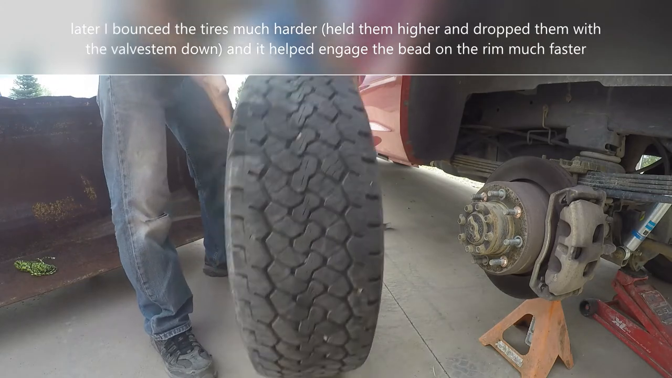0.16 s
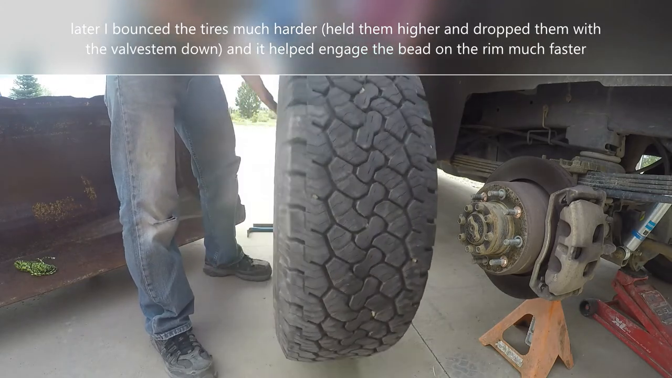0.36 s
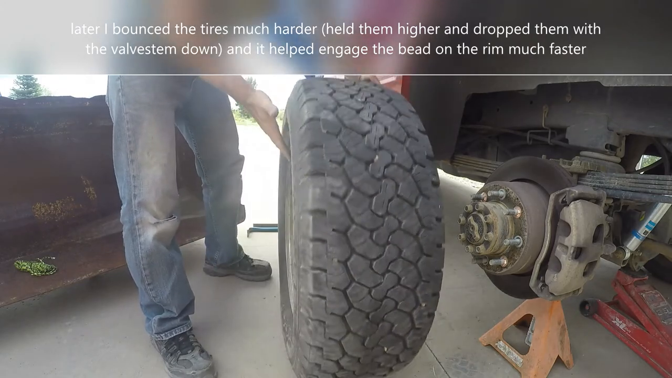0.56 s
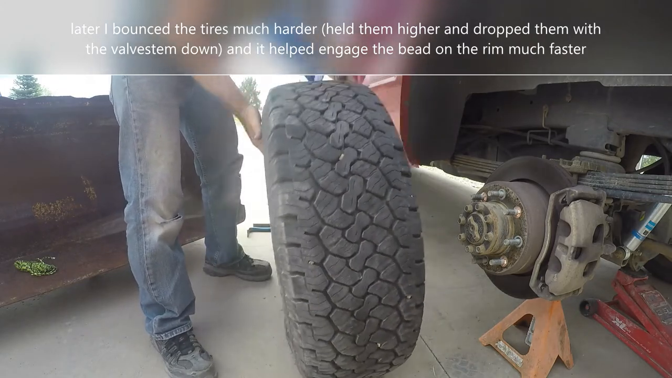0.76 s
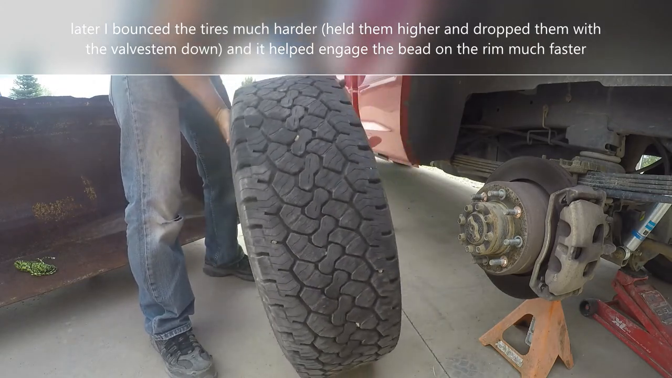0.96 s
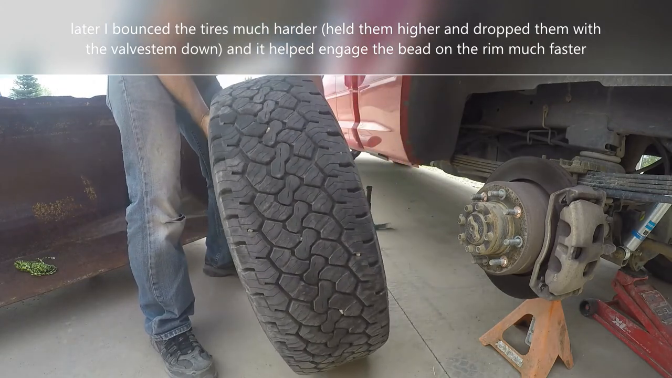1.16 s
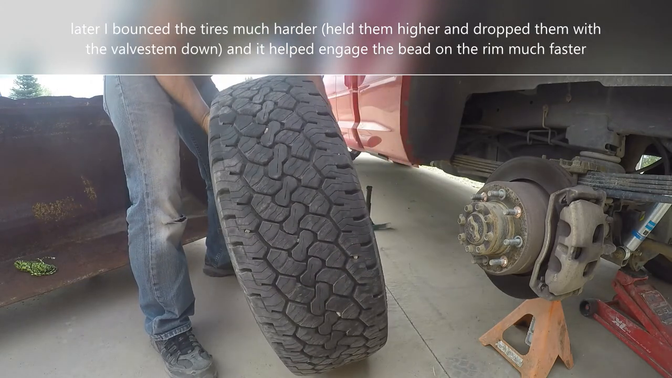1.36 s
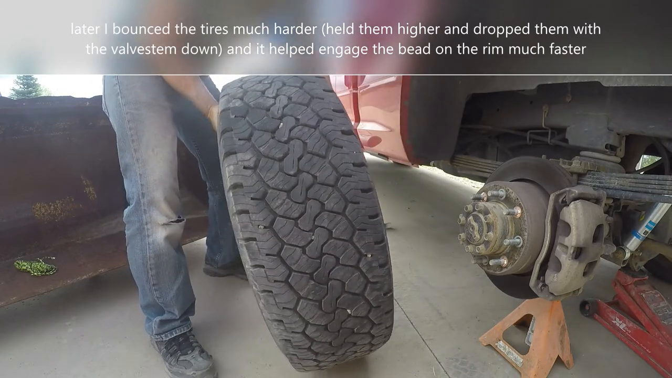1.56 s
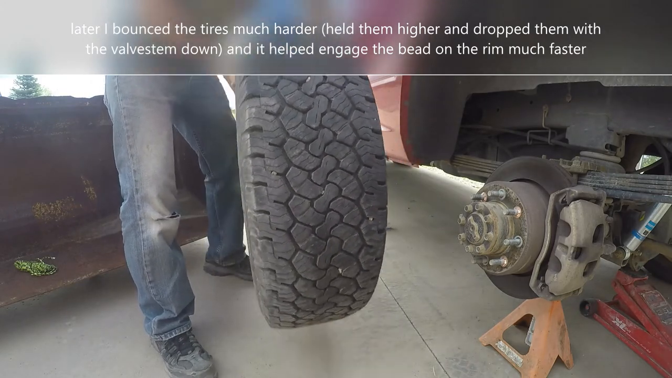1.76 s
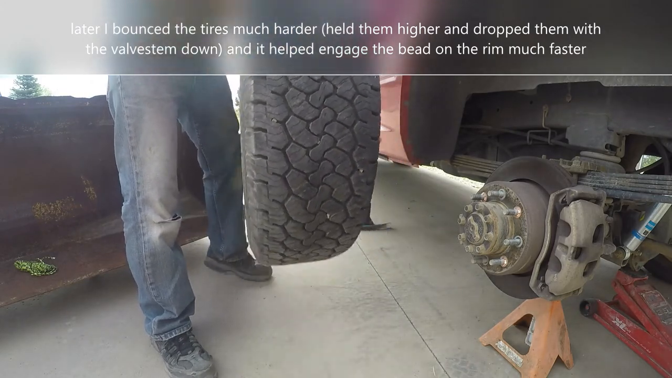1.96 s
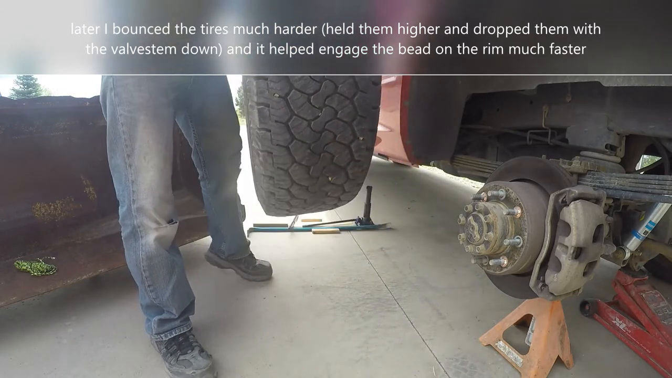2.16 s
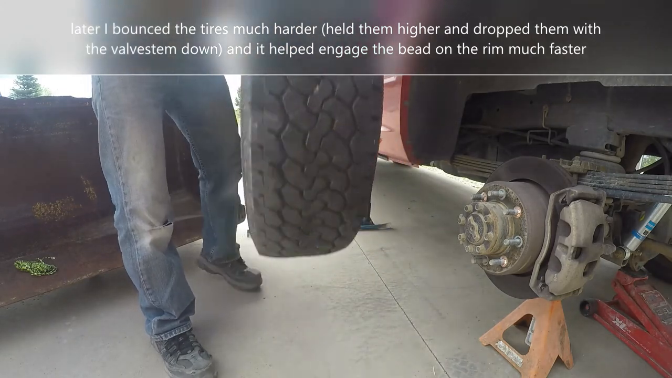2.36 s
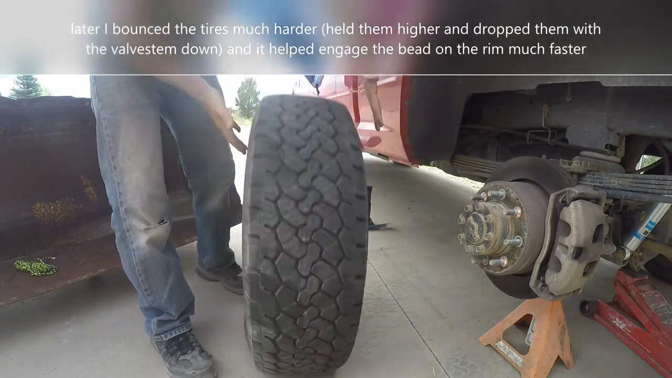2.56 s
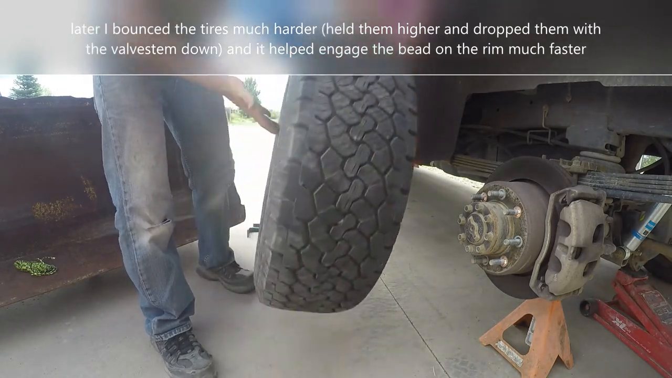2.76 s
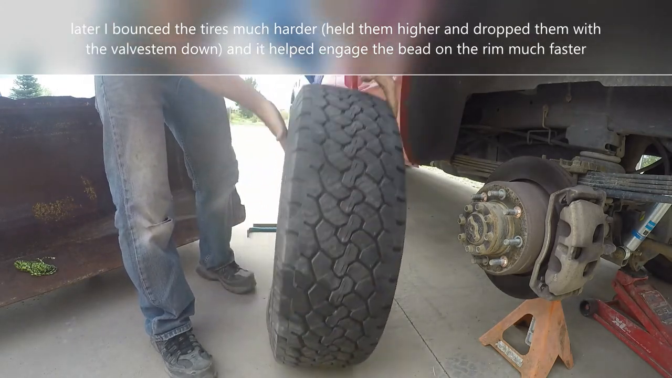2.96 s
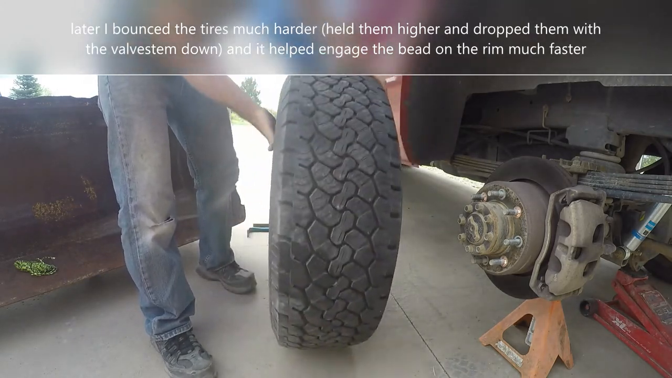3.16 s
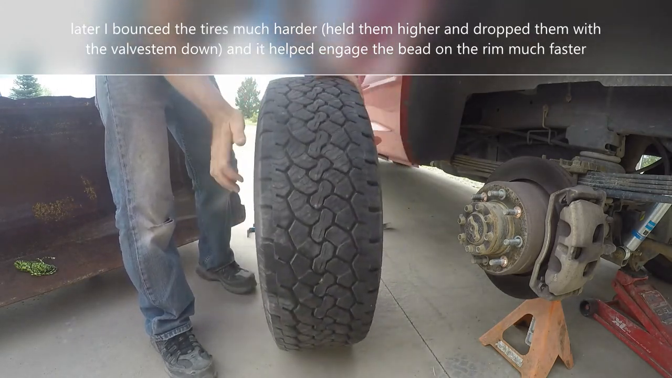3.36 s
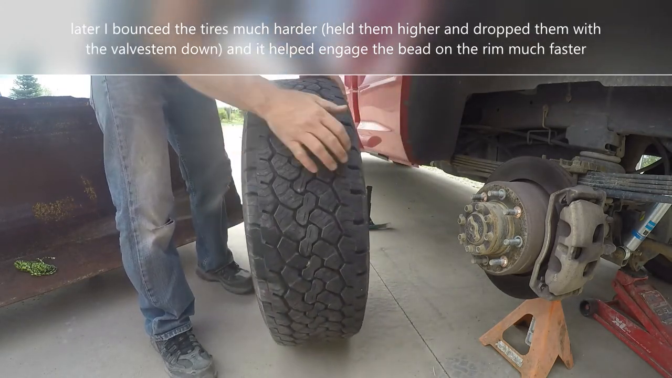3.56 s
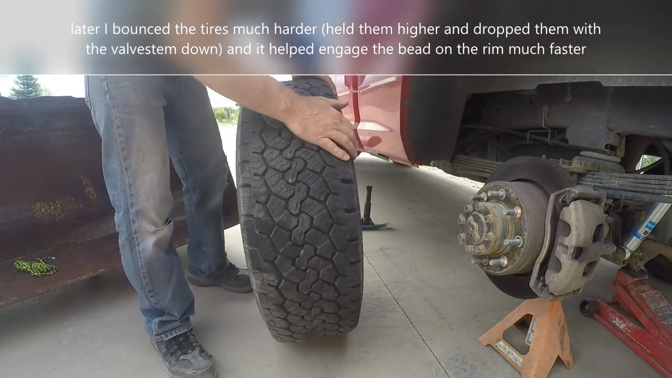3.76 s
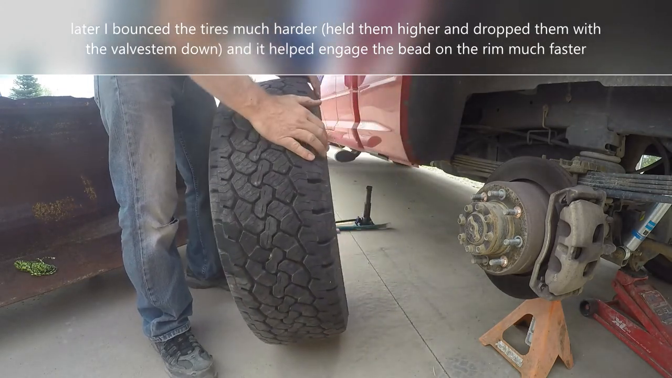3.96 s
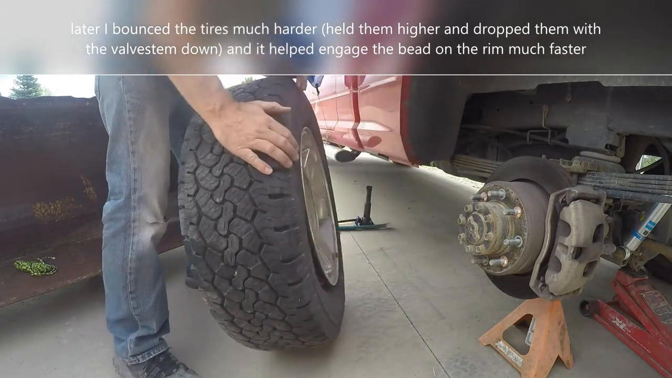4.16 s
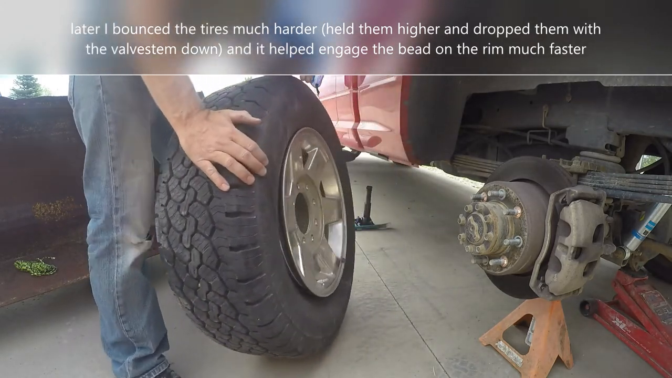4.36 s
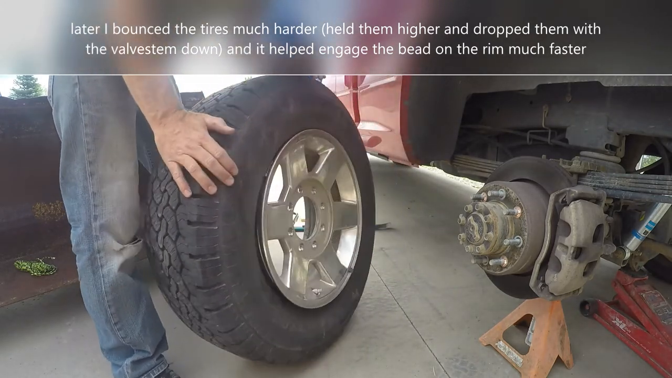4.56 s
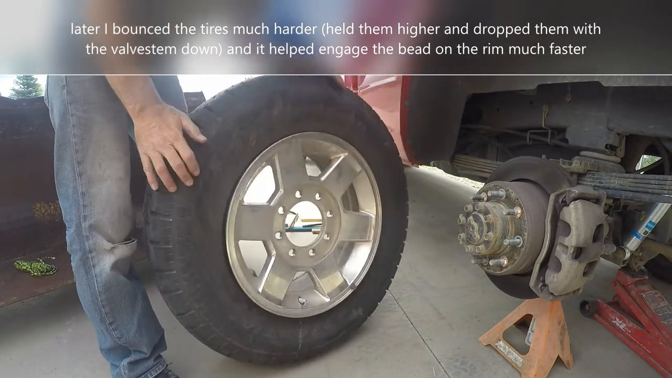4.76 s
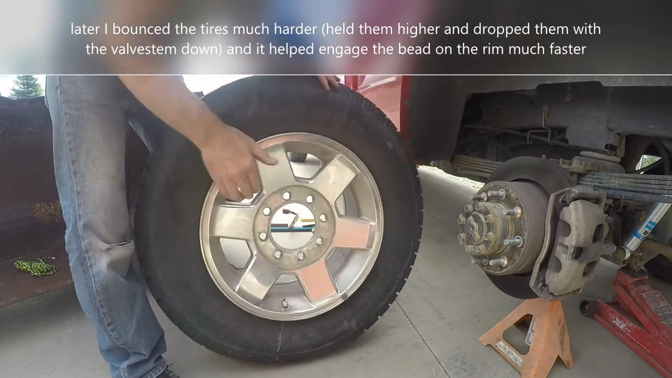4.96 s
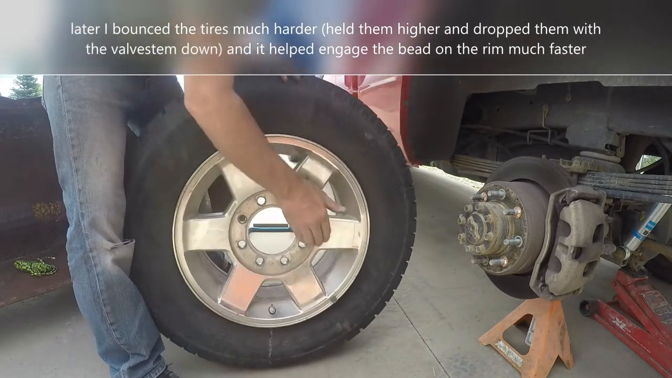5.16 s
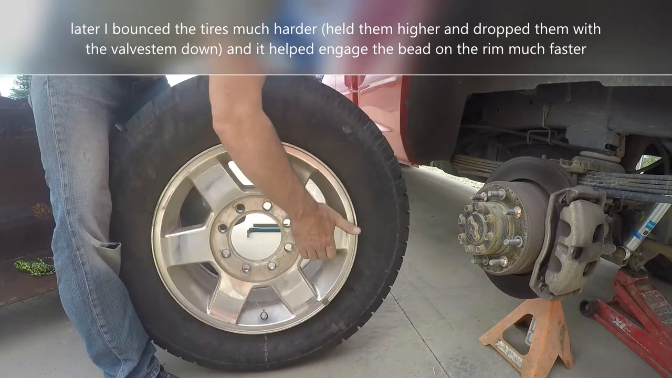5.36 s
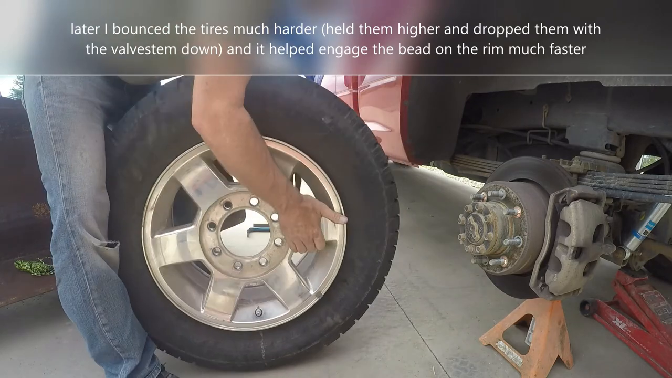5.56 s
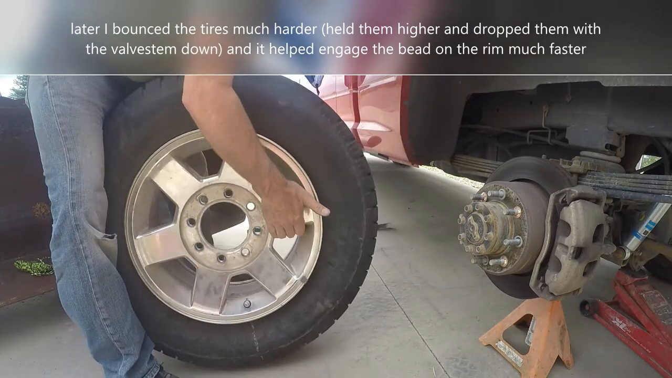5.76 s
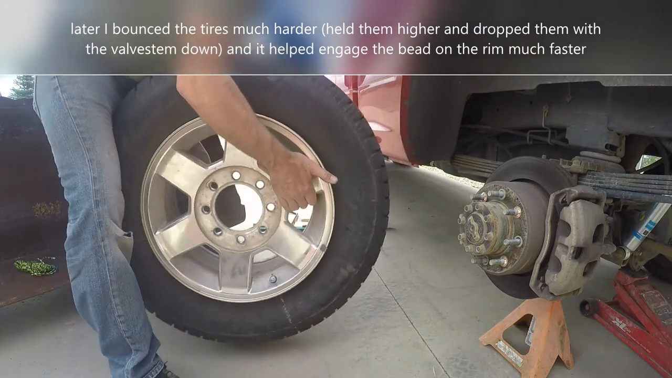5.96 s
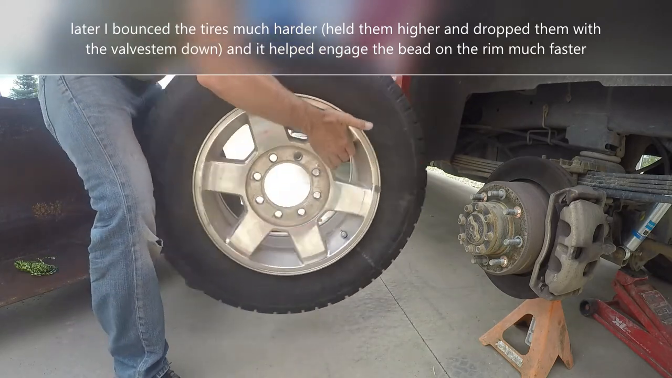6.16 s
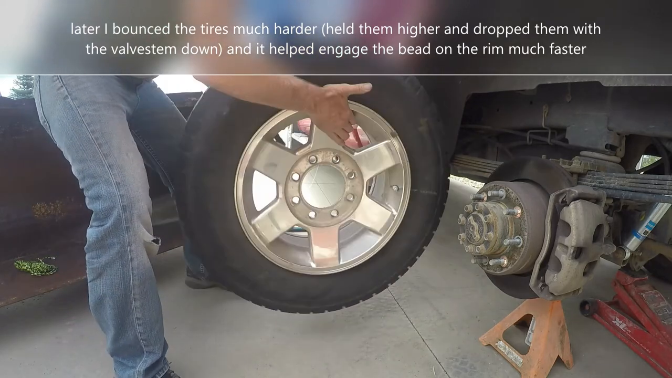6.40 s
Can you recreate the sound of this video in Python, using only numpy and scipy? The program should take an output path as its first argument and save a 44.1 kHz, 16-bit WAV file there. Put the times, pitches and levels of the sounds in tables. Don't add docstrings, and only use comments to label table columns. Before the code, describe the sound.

Two loud, boomy tyre drops with quick shrinking bounces on concrete, followed by hollow hand knocks, a short tread roll and rubbing over faint rumble.

```python
import sys
import numpy as np
from scipy import signal
from scipy.fft import rfft, irfft
from scipy.io import wavfile
from scipy.ndimage import uniform_filter1d

SR = 44100
rng = np.random.default_rng(int(sys.argv[2]) if len(sys.argv) > 2 else 0)


def generate_wav(signal):
    frames = np.transpose(np.atleast_2d(signal))
    scaled = np.clip(frames, -1, 1) * 32767
    pcm = np.round(scaled).astype(np.int16)
    wavfile.write(sys.argv[1], SR, pcm)


def natural_amplitude(level_db):
    exponent = np.asarray(level_db, float) / 20
    return 10 ** exponent


N = 283544
T = np.arange(N) / SR

# start, attack, hold and release, all in seconds.
ROLL = (4.342, 0.13, 0.44, 0.18)


def fade(t, t60):
    return (t >= 0) * np.exp(-np.log(1000) * np.maximum(t, 0) / t60)


def ring(t, hz, t60):
    return fade(t, t60) * np.sin(2 * np.pi * hz * t)


def strike(t, modes, touch):
    out = 0
    for (hz, db, t60), z in zip(modes, touch):
        out = out - natural_amplitude(db - 6.0 + 2.0 * z) * ring(t, hz * (1 + 0.012 * z), t60)
    return out


def band(x, lo_hz, hi_hz, order=2):
    sos = signal.butter(order, [lo_hz, min(hi_hz, .45 * SR)], "bandpass", fs=SR, output="sos")
    return signal.sosfilt(sos, x)


def soften(x, hz):
    return signal.sosfilt(signal.butter(2, hz, fs=SR, output="sos"), x)


def hiss(lo_hz, hi_hz, count=N):
    x = band(rng.standard_normal(count), lo_hz, hi_hz, order=3)
    return x / x.std()


def walk(rate):
    k = int(SR / rate)
    steps = np.repeat(rng.standard_normal(N // k + 1), k)
    return 1.3 * uniform_filter1d(uniform_filter1d(steps, k), k)[:N]


def swell(s, attack, hold, release):
    rising = (T - s) / attack
    falling = (s + attack + hold + release - T) / release
    return np.clip(np.minimum(rising, falling), 0, 1)


def add(out, s, x):
    i = int(s * SR)
    out[i:i + len(x)] += x[:len(out) - i]


def town():
    # frequency in Hz, level in dB per Hz.
    spectrum = [(20, -4.5), (60, -5), (150, -16), (280, -26), (1300, -34.5), (2500, -39), (6000, -43.5),
                (15000, -49.5)]
    # frequency in Hz, width in octaves, lift in dB.
    peaks = [(50.7, .22, 10.5), (674, 0.23, 13), (3800, 0.71, 3.5)]
    rows = np.array(spectrum)
    hz = np.arange(N // 2 + 1) * SR / N + 1
    db = np.interp(np.log(hz), np.log(rows[:, 0]), rows[:, 1])
    for peak_hz, width, peak_db in peaks:
        db = db + peak_db * np.exp(-(np.log2(hz / peak_hz) / width) ** 2)
    lines = rfft(rng.standard_normal(N)) * natural_amplitude(db) * (hz < 15300)
    rumble = 0
    edges = [0, 40, 70, 130, 300, 1000, SR]
    for lo, hi in zip(edges, edges[1:]):
        swelling = natural_amplitude(1.1 * walk(5.8) * min(1, 300 / hi))
        rumble = rumble + swelling * irfft(lines * (hz >= lo) * (hz < hi), N)
    drone_hz = 51 + 2.8 * walk(4.5)
    drone = natural_amplitude(-55.5 + 2.5 * walk(5.5)) * np.sin(2 * np.pi * np.cumsum(drone_hz) / SR)
    return rumble * natural_amplitude(-48) / rumble.std() + drone


def wildlife():
    # start in seconds, length in seconds, level in dB.
    phrases = [(4.16, .3, -70.5), (4.465, 0.093, -66.5), (4.6, 0.32, -74), (5.48, .28, -75),
               (5.874, 0.088, -70.5), (5.98, .1, -79), (6.167, 0.087, -67.5), (6.39, .1, -68)]
    # start, attack, hold and release, all in seconds.
    chirp_shape = (6.335, .05, .1, .05)
    hz = 3735 + 10 * walk(3) + 45 * walk(150)
    note = natural_amplitude(3.0 * walk(40)) * np.sin(2 * np.pi * np.cumsum(hz) / SR)
    haze = natural_amplitude(-7) * hiss(3430, 3900)
    attack_s, release_s = 0.026, 0.099
    song = sum(natural_amplitude(db) * swell(s, attack_s, length - attack_s, release_s) for s, length, db in phrases)
    late = np.clip((T - 6.375) / .02, 0, 1)
    chirp = hiss(7050, 7110) + natural_amplitude(9) * late * hiss(3600, 5200)
    return natural_amplitude(2.5) * song * (note + haze) + natural_amplitude(-72) * swell(*chirp_shape) * chirp


def rubbing():
    roll_db = (-61, -66, -51, -61)
    # peak time in seconds, length in seconds, level in dB,
    # hiss share in dB, bass share in dB.
    scuffs = [(0.066, 0.055, -56, -13, 3), (1.147, 0.37, -58.5, -25.5, 6), (1.727, 0.094, -56.5, -18, -12),
              (1.783, 0.049, -66, -2, -5.5), (1.85, 0.087, -57.5, -12.5, 0), (2.13, 0.056, -60, -26.5, 5),
              (2.262, 0.09, -58.5, -17.5, -19.5), (2.427, 0.0635, -41.5, -13.5, -2),
              (2.458, 0.044, -37.5, -34, -13), (3.432, 0.085, -50, -10, 12),
              (3.709, 0.074, -51.5, -17, 9.5), (3.776, 0.14, -42, -15.5, -8.5),
              (4.058, 0.0824, -45, -11.5, -26), (4.323, .1, -42.5, -20, -2.5), (4.525, 0.05, -67, 8, 1),
              (5.191, 0.2, -52.5, -11, -12), (5.356, 0.098, -45, -16.5, -9.5),
              (5.533, 0.13, -50.5, -11.5, -13.5), (5.664, 0.21, -44, -18, 0), (6.0, 0.3, -55.5, -9.5, 4),
              (6.078, 0.083, -43, -22, 0), (6.163, 0.208, -54, -19, -8), (6.42, 0.153, -66, -4.5, -6.5)]
    fidget_db = (-66, -79, -68, -82.5)
    fidget, roll = 2.5 * walk(8.8), swell(*ROLL)
    gains = np.array([natural_amplitude(still + fidget) + natural_amplitude(turning) * roll for still, turning in zip(fidget_db, roll_db)])
    rise_share, fade_db = 0.5, 31.5
    for s, length, db, hiss_db, bass_db in scuffs:
        away = np.maximum((s - T) / rise_share, (T - s) / (1 - rise_share)) / length
        scrape_db = -5.5 + 0.4 * hiss_db
        shares = natural_amplitude(np.array([[0], [hiss_db], [bass_db], [scrape_db]]))
        gains = gains + shares * natural_amplitude(db - fade_db * away / 2)
    return gains


def handling():
    # start in seconds, peak in dB, treble in dB, bass in dB.
    knocks = [(2.127, -40.5, -45, -11.5), (2.149, -46, -20.5, -10), (2.412, -31.5, -15.5, -12),
              (2.45, -29.5, -29, -23.5), (3.425, -39.5, -17, -3), (3.684, -50.5, -3.5, -6),
              (4.273, -23, -37.5, -16.5), (4.312, -29.5, -26, -1.5), (4.339, -48.5, -12.5, -3),
              (4.505, -50, -6, -20), (4.537, -52, 2, -21.5), (4.757, -50, 0, -23), (5.35, -27.5, -28, -26),
              (5.507, -38.5, -24, -16), (5.538, -35, -24, -9), (5.627, -33.5, -30, -24),
              (5.781, -46, -16.5, -3), (5.887, -56, -11, -18), (6.073, -32, -21, -36),
              (6.178, -44, -25, -15)]
    # centre in Hz, half-width in Hz, level in dB.
    squeaks = [(2250, 260, -71), (2570, 250, -69), (1350, 119, -68.5)]
    out, t = np.zeros(N), T[:SR // 4]
    for s, db, treble_db, bass_db in knocks:
        thud = soften(ring(t, 640, 0.037), 1400) + natural_amplitude(-19.5) * hiss(230, 840, count=len(t)) * fade(t, 0.16)
        tick = hiss(1100, 4000, count=len(t)) * fade(t, 0.05)
        boom = hiss(100, 300, count=len(t)) * fade(t, 0.15)
        add(out, s, natural_amplitude(db - 2.5) * (thud + natural_amplitude(treble_db - 3) * tick + natural_amplitude(bass_db - 1.5) * boom))
    squeak = sum(natural_amplitude(db + 2.5 * walk(60)) * hiss(hz - width, hz + width) for hz, width, db in squeaks)
    out += swell(*ROLL) * squeak
    body = natural_amplitude(-7.5) * (hiss(540, 638) + natural_amplitude(1) * hiss(344, 730))
    layers = body, hiss(1400, 4920), natural_amplitude(-8.5) * hiss(73, 390), natural_amplitude(-2) * hiss(670, 1200)
    for layer, gain in zip(layers, rubbing()):
        out += natural_amplitude(2.5 * walk(120)) * layer * gain
    return out


def gusts():
    # start in seconds, peak in dB, frequency in Hz, t60 in seconds, sign of the first push.
    blasts = [
        (.905, -24, 90, .15, 1),
        (2.563, -2, 51, .18, 1),
        (3.007, -2, 46, .16, -1),
        (3.052, -19, 62, .25, 1),
        (3.408, -27, 95, .15, 1),
    ]
    out, t = np.zeros(N), T[:int(.6 * SR)]
    for s, db, hz, t60, sign in blasts:
        add(out, s, sign * natural_amplitude(db) * ring(t, hz, t60) * (1 - np.exp(-t / .006)))
    return out


def grit():
    # start in seconds, rise in seconds, hold in seconds, level in dB, share of top treble in dB.
    sprays = [(0.11, 0.017, 0.037, -42, -14), (0.492, .005, 0.053, -55.5, -10), (.73, .004, .02, -63, -18),
              (2.555, 0.0052, 0.076, -51.5, -21), (2.562, 0.0078, 0.012, -46, -14.5),
              (2.705, .01, .02, -65, -25), (2.975, 0.0021, 0.034, -48, -22), (2.984, .02, 0.014, -58, -1),
              (3.048, .003, 0.0166, -52, -18.5), (3.24, 0.0057, 0.032, -58, -18)]
    out, t = np.zeros(N), T[:int(.6 * SR)]
    for s, rise, hold, db, top_db in sprays:
        top = soften(hiss(5500, 15000, count=len(t)), 7500)
        spray = hiss(2300, 5200, count=len(t)) + natural_amplitude(top_db + 5) * top
        grain_db = 2.5 * walk(260)[:len(t)]
        shape = np.clip(t / rise, 0, 1) * np.maximum(fade(t - rise - hold, 0.26), t < rise + hold)
        add(out, s, natural_amplitude(db + grain_db - 2.5) * spray * shape)
    return out


def shop(t, tail_db):
    # frequency in Hz, early level in dB, early t60 in seconds, late level in dB, late t60 in seconds.
    reverberation = [(148.54, -24, 0.33, -31.5, 0.7), (318, -10.5, 0.066, -31, 0.45),
                     (600, -10, 0.081, -28.5, 0.49), (817, -33, 0.26, -37.5, 0.59),
                     (1123, -18.5, 0.027, -30.5, 0.33), (2220, -34.5, .07, -47, 0.42),
                     (4000, -56, 0.054, -50, 0.46), (8030, -60.5, 0.029, -73.5, .35)]
    out = 0
    for hz, early_db, early_t60, late_db, late_t60 in reverberation:
        fall = natural_amplitude(early_db) * fade(t, early_t60) + natural_amplitude(late_db) * fade(t, late_t60)
        lift = natural_amplitude(tail_db * (hz > 1500))
        out = out + lift * fall * hiss(hz / 1.3, hz * 1.3, count=len(t))
    return out * (1 - np.exp(-t / 0.00067))


def slab(t):
    # frequency in Hz, level in dB, t60 in seconds.
    floor_modes = [(24.4, 3.5, 0.25), (39.9, -7.5, 0.518), (74.4, -5, 0.39), (129.6, -14, .15)]
    dip = -natural_amplitude(1.5) * np.sin(np.pi * np.clip(t / 0.011, 0, 1)) ** 2
    return dip + sum(natural_amplitude(db) * ring(t - .005, hz, t60) for hz, db, t60 in floor_modes)


def tread_wavelet(t):
    pulse = -np.exp(1) * (t > 0) * t / 0.0011 * np.exp(-np.abs(t) / 0.00068)
    return pulse * np.sin(2 * np.pi * 760 * t)


def slap(t, thud_db, tread_db, rim_db):
    # frequency in Hz, level in dB, t60 in seconds.
    sidewall_modes = [(202, -2.5, 0.11), (281, -4.5, .08), (338, -5.5, 0.097)]
    carcass_modes = [(544.2, -3, 0.084), (565, -8.5, 0.071), (637, 4.5, 0.04), (695.9, -3.5, 0.15)]
    rim_modes = [(978.4, -7, .05), (985, -2.5, 0.037), (1211, -1.5, 0.02), (1450, -12.5, 0.036),
                 (1566.3, -22, 0.11), (2200, -23, 0.014), (2386, -21, 0.0066), (2500, -27, 0.03)]
    # multiple of its lap rate, level in dB, t60 in seconds.
    air_modes = [(1, -40, 0.99), (2, -44, 1), (3, -46, 0.93), (4, -45.5, 0.99)]
    air_hz = 187
    touch = rng.standard_normal(len(rim_modes))
    laps = sum(natural_amplitude(7.5 - 7.6 * k) * tread_wavelet(t - k / air_hz) for k in range(4))
    body = natural_amplitude(thud_db) * strike(t, sidewall_modes, touch[4:])
    body = body + natural_amplitude(tread_db) * strike(t, carcass_modes, touch)
    body = body + natural_amplitude(rim_db) * strike(t, rim_modes, touch[::-1])
    air = sum(natural_amplitude(db) * ring(t, k * air_hz, t60) for k, db, t60 in air_modes)
    return laps + (body + air) * (1 - np.exp(-t / .002))


def crack(t, db, hz):
    noise = hiss(1400, 5000, count=len(t)) + natural_amplitude(-20) * hiss(3100, 15000, count=len(t))
    snap = band(t == 0, 1250, 2700) * 14 * natural_amplitude(2.5)
    crack_db = db - 12.5 + 3.5 * np.log2(hz / 4000)
    return natural_amplitude(crack_db) * (soften(noise * fade(t, .005), 1.2 * hz) - soften(snap, 1.6 * hz))


def tyre():
    # start in seconds, slap in dB, contact brightness in Hz, slab in dB, rim ring in dB.
    landings = [
        (0.1113, -1.5, 2480, -8.5, -9),
        (.4943, 1.5, 4000, -19, 4),
        (0.73, -23.5, 1060, -25.5, -17.5),
        (0.903, -39.5, 494, -39, -2),
        (2.5528, 4.5, 4000, -11.5, 2),
        (2.9744, -16.5, 2226, -16.5, -7),
        (3.2374, -11.5, 2310, -24.5, 5),
        (3.404, -35.5, 710, -33, -3.5),
    ]
    # lag in seconds, front in dB, scatter in dB, boom in dB.
    wall_returns = [(.073, -9, -20, -9.5), (.0765, -17.5, -21.5, -28), (0.036, -32.5, -51, -39),
                    (0.16, -62, -60.5, -52), (.067, -29, -17.5, -8.5), (.074, -30, -30, -22.5),
                    (0.027, -38, -43.5, -37), (0.13, -60, -55.5, -45.5)]
    # sidewall thud, tread ring, reverberation, grit-band tail, all in dB.
    shares = [(3.5, -1.5, -0.5, 9.5), (-9.5, -8, -1, 4.5), (4, 3.5, 5.5, 10.5), (10.5, -1, 3.5, 0),
              (-4.5, -2.5, -1.5, 0.5), (6.5, 4.5, 6.5, -2), (-7.5, 2.5, 0.5, 11.5), (5, 2, -1.5, 0)]
    out, t = np.zeros(N), T[:int(.6 * SR)]
    near = t[:SR // 4]
    for (s, db, hz, slab_db, rim_db), wall, share in zip(landings, wall_returns, shares):
        lag, front_db, scatter_db, boom_db = wall
        thud_db, tread_db, room_db, tail_db = share
        direct, shake = slap(t, thud_db, tread_db, rim_db), slab(t)
        blow = soften(direct + natural_amplitude(room_db) * shop(t, tail_db), hz)
        add(out, s, natural_amplitude(db) * blow + natural_amplitude(slab_db) * shake)
        squeeze_s = .0015
        squeeze = np.sin(np.pi * np.clip(near / squeeze_s, 0, 1)) ** 2
        add(out, s - squeeze_s, natural_amplitude(db - 23) * squeeze)
        add(out, s + 0.00026, crack(near, db, hz))
        front = natural_amplitude(front_db) * band(direct * fade(t, 0.13), 150, 730)
        scatter = hiss(130, 940, count=len(near)) * fade(near, .11) * (1 - np.exp(-near / 0.0015))
        add(out, s + lag, front + natural_amplitude(boom_db) * shake * fade(t, .15))
        add(out, s + lag - .006, natural_amplitude(scatter_db) * scatter)
    return out


def scene():
    return (town() + wildlife() + handling() + gusts() + grit() + tyre())[None]


def thin_treble(x):
    # centre in seconds, length in seconds, share of lines kept, lowest frequency thinned in Hz.
    thin_moments = [(1.245, .02, .2, 1500), (1.82, .02, .15, 1500), (2.358, .02, .15, 1500),
                    (4.295, .015, .04, 1800), (4.66, .02, .15, 2500), (5.11, .015, .15, 1500),
                    (5.162, .03, .015, 1000), (5.187, .026, .02, 1000), (5.28, .012, .02, 900),
                    (5.49, .015, .1, 1200), (5.93, .025, .018, 1300), (6.26, .015, .12, 1200)]
    out = x.copy()
    for s, length, share, hz in thin_moments:
        margin = int(length * SR)
        i, n = int(s * SR) - 1024 - margin, 2048 + 2 * margin
        window = np.hanning(n)
        lines = rfft(out[i:i + n] * window)
        size = np.abs(lines)
        strength = uniform_filter1d(size, size=3) / uniform_filter1d(size, size=200) ** .4
        treble = np.arange(len(lines)) * SR / n > hz
        weak = treble & (strength < np.quantile(strength[treble], 1 - share))
        lost = irfft(lines * weak, n)
        gate = np.clip(1 - (np.abs(T[i:i + n] - s) - length / 2) / .006, 0, 1)
        out[i:i + n] -= gate * lost / np.maximum(window, .05)
    return out


def band_limit(x):
    return signal.sosfilt(signal.butter(12, 16550, fs=SR, output="sos"), x)


def record(dry):
    # frequency in Hz, level in dB.
    whine = [(10287, -87.5)]
    x = dry[0]
    slew = 1 / (.25 * SR)
    loudness = signal.lfilter([slew], [1, slew - 1], np.abs(x))
    x = x / (1 + loudness / 0.5)
    for hz, db in whine:
        throb = 1 + 1.4 * np.sin(2 * np.pi * 24 * T + 1.5 * walk(11))
        x = x + natural_amplitude(db + 3) * np.sin(2 * np.pi * hz * T) * throb
    knee = 8
    x = x / (1 + np.abs(x / .98) ** knee) ** (1 / knee)
    return band_limit(thin_treble(x)[None])


dry = scene()
out = record(dry)
generate_wav(out)
```